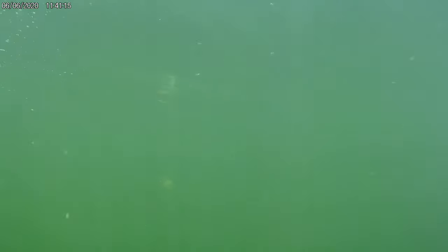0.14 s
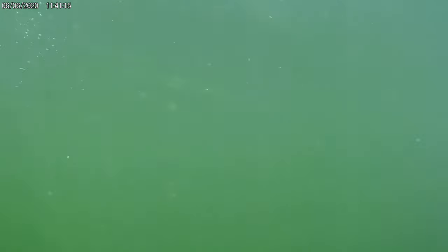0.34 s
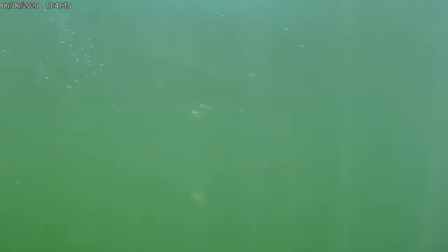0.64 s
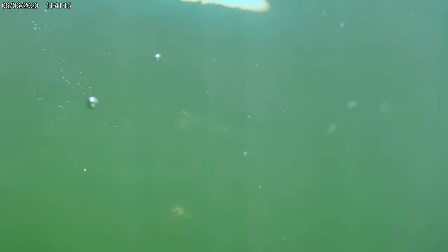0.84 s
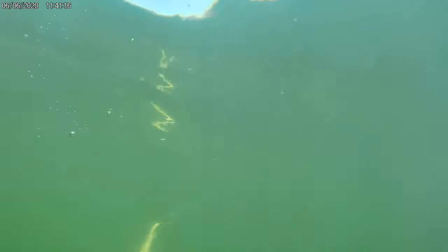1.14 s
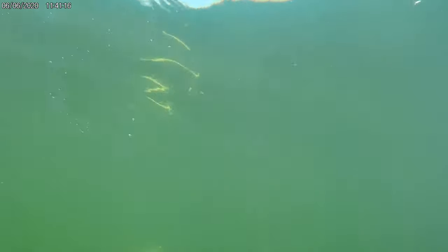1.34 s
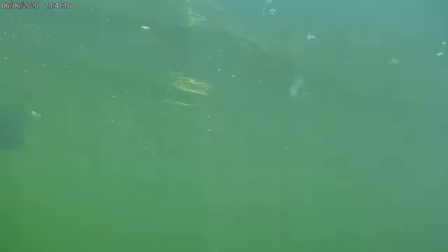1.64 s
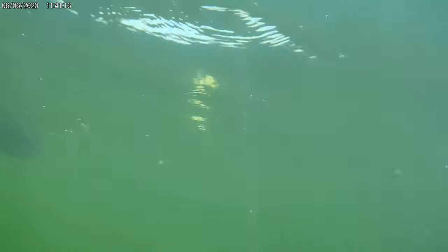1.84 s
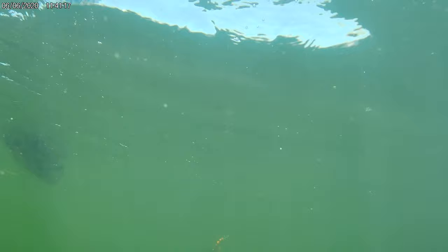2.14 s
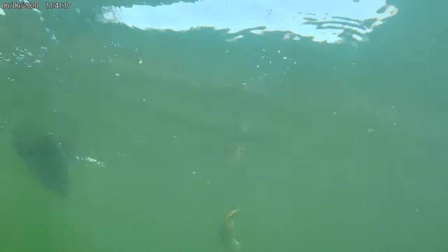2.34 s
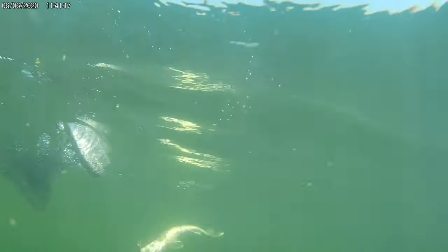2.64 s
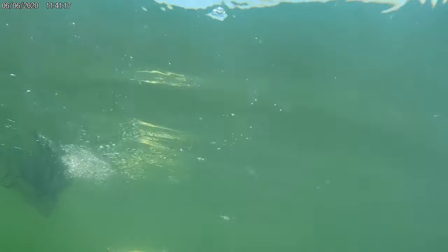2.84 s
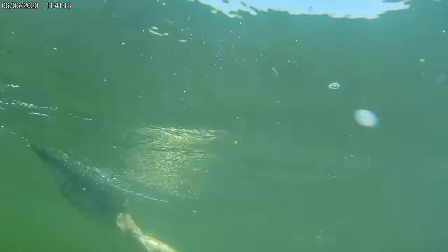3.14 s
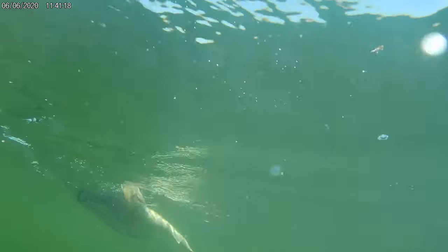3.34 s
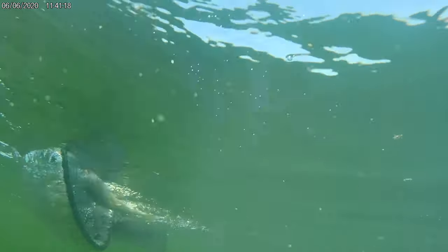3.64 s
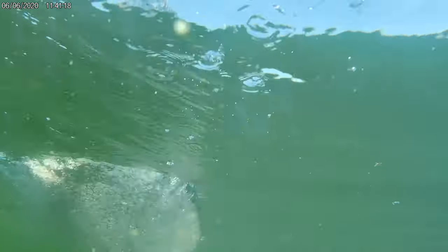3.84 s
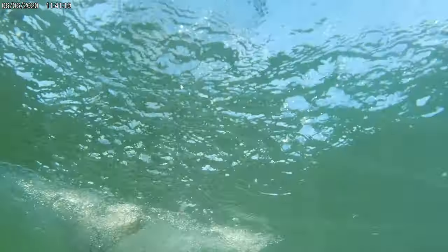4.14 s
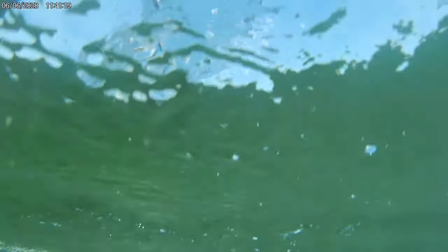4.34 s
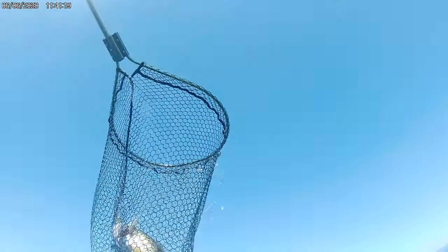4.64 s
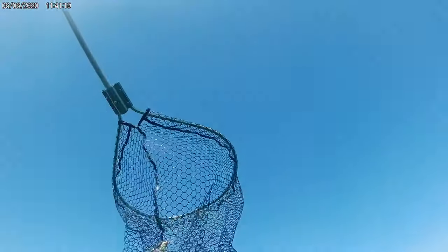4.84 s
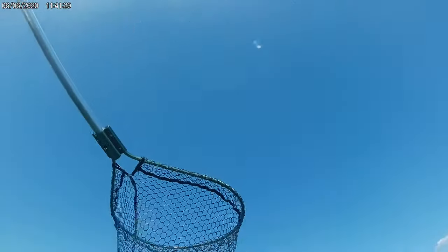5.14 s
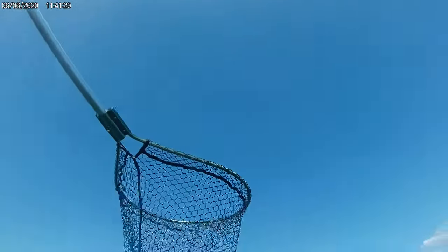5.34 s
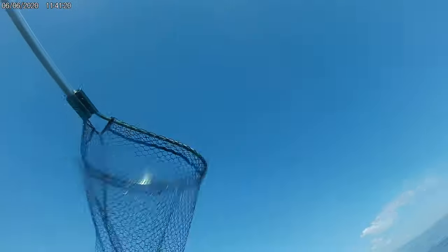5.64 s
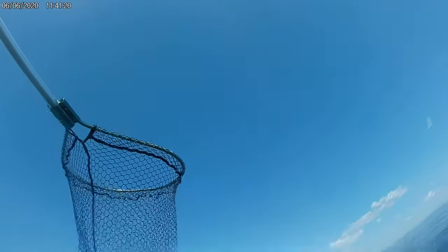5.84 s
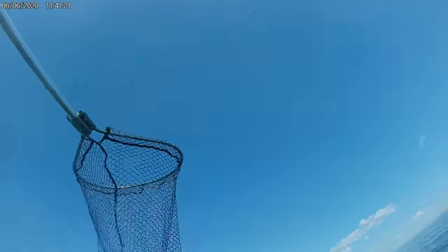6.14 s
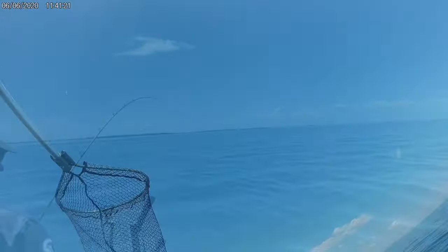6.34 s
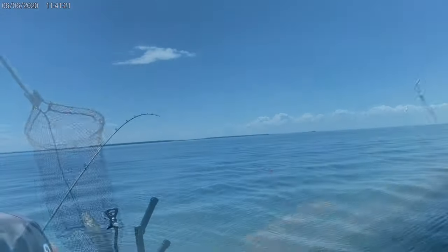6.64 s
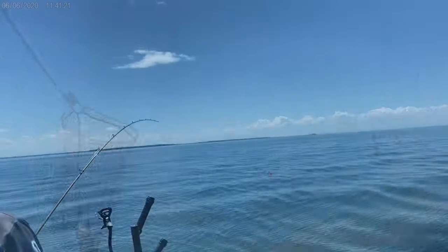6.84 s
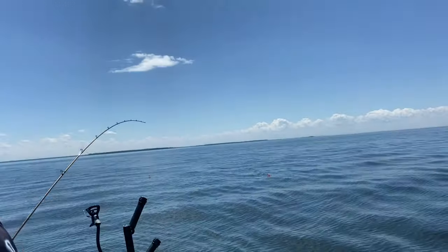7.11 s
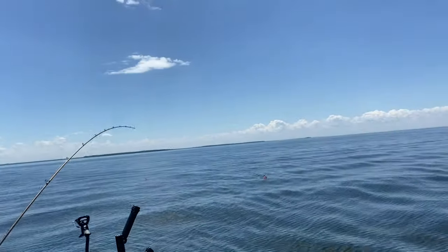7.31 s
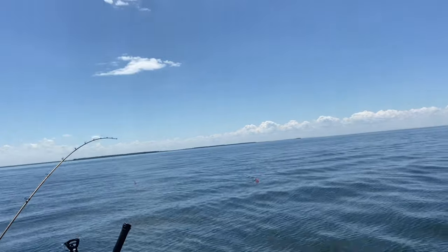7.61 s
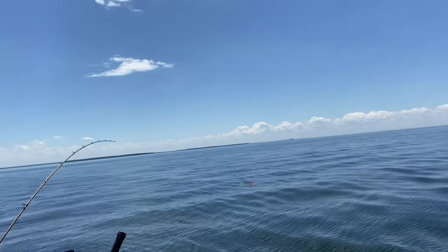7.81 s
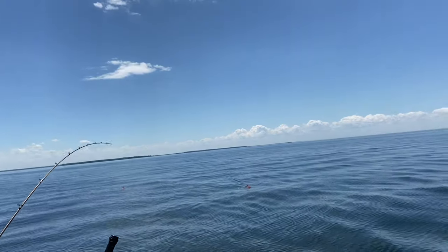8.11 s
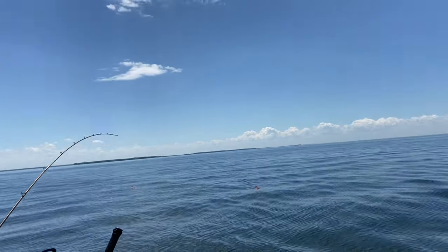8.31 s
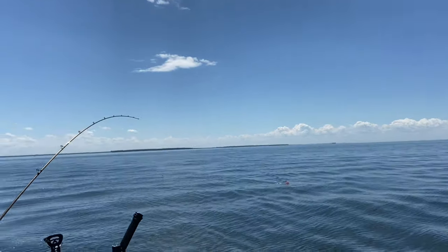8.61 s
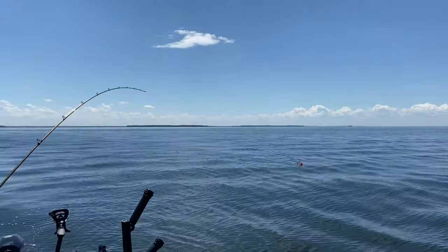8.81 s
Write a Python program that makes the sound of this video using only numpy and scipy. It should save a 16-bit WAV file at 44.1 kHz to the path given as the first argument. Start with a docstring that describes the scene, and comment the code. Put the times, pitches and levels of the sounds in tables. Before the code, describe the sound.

Muffled boat engine putters and rattles underwater, bubbles burst at surfacing, water drains, thumps knock the casing, then faint reel ticking and lapping water.

```python
"""An idling four-cylinder outboard chugs and whirrs, close under water, as a camera on a pole drifts nearer.
Uneven noise puffs and engine-order tones make the exhaust, struck resonances the gears, grains the fish's fizz.
The camera surfaces with two gulps of damped rising notes, then hangs in the air, draining, on a humming pole.
Bumps ring the housing; the sound fades over to the deck: faint motor, a ticking reel made of decaying noise,
and wavelets of swelling noise lapping at the hull."""
import sys
import numpy as np
from scipy import signal
from scipy.fft import rfft, irfft
from scipy.io import wavfile

SR = 44100
rng = np.random.default_rng(int(sys.argv[2]) if len(sys.argv) > 2 else 0)


def dump_mix(stems):
    """Bounce the given channels to the path in sys.argv[1] as a 16-bit WAV at rate SR."""
    frames = np.atleast_2d(stems).T  # one column per channel
    limited = np.clip(frames, -1, 1)  # hard clip at full scale
    pcm = np.round(limited * 32767).astype(np.int16)
    wavfile.write(sys.argv[1], SR, pcm)


N = 395577
TIME = np.arange(N) / SR
BINS = np.fft.rfftfreq(N, 1 / SR)


def amp(db):
    """Amplitude factor of a level in dB."""
    return 10 ** (np.asarray(db) / 20)


def evened(x):
    """Scales a signal to rms 1."""
    return x / np.sqrt(np.mean(x ** 2) + 1e-20)


def curve(rows, column=1):
    """Straight lines through a table whose first column is time."""
    rows = np.array(rows)
    return np.interp(TIME, rows[:, 0], rows[:, column])


def fade(start, end):
    """Goes from 0 at start to 1 at end; falls from 1 to 0 if they are swapped."""
    return np.clip((TIME - start) / (end - start), 0, 1)


def since(s):
    """Seconds gone by since s, zero before it."""
    return np.maximum(TIME - s, 0)


def add(mix, s, sound):
    """Adds a sound into the mix from s seconds on."""
    part = mix[round(s * SR):][:len(sound)]
    part += sound[:len(part)]


def shape(points):
    """Gain per frequency from a short spectrum."""
    hz, db = np.transpose(points)
    return amp(np.interp(np.log(BINS + 1), np.log(hz), db))


def body(points, modes):
    """Gain per frequency: a broad spectrum plus steep-sided resonances."""
    power = sum(amp(db) ** 2 / (1 + ((BINS - hz) / width) ** 2 * 2) ** 3 for hz, width, db in modes)
    return np.sqrt(power + (shape(points) ** 2 if points else 0))


def causal(gain):
    """The same colour, ringing only after it is struck."""
    lag = np.arange(N)
    cepstrum = irfft(np.log(gain + 1e-5), N)
    return np.exp(rfft(cepstrum * np.where(lag == 0, 1, 2 * (lag < N / 2))))


def colour(x, gain):
    """Filters a signal and scales it to rms 1."""
    return evened(irfft(rfft(x) * gain, N))


def noise():
    """White noise, rms 1."""
    return rng.standard_normal(N)


def drift(hz):
    """Slow chance, rms 1."""
    return colour(noise(), np.exp(-(BINS / hz) ** 2))


def grains(per_s, spread_db):
    """Sparse clicks of very unequal size."""
    size = amp(spread_db * np.minimum(rng.exponential(1, N), 4))
    return evened(noise() * (rng.random(N) < per_s / SR) * size)


def cloud(per_s, spread_db, count=30):
    """Small bubbles of every size, each a short rising note."""
    out = np.zeros(N)
    for hz in np.geomspace(650, 11000, count) * rng.uniform(.96, 1.04, count):
        turns = np.arange(int(40 * SR / hz)) * hz / SR
        swell = np.exp(-turns / 5) * (1 - np.exp(-turns))
        bubble = np.sin(2 * np.pi * turns * (1 + 0.0032 * turns)) * swell
        out += hz * signal.oaconvolve(grains(per_s, spread_db), bubble)[:N]
    return evened(out)


def swells(rows, rise_s, t60):
    """Envelope of events (time [s], length [s], level [dB]): each rises, holds and dies away."""
    power = np.zeros(N)
    for s, length, db in rows:
        rise = np.minimum(since(s) / rise_s, 1)
        power += (rise * amp(db - 60 * np.minimum(since(s + length) / t60, 3))) ** 2
    return np.sqrt(power)


def rings(rows, rise, attack_s):
    """Damped notes (time [s], peak [dB], first pitch [Hz], t60 [s]) whose pitch glides as they die."""
    out = np.zeros(N)
    for s, db, hz, t60 in rows:
        t = np.arange(int(1.3 * t60 * SR)) / SR
        turns = np.cumsum(hz * (1 + rise * t / t60)) / SR
        swell = (1 - np.exp(-t / attack_s)) * amp(-60 * t / t60)
        add(out, s, amp(db) * swell / swell.max() * np.sin(2 * np.pi * turns))
    return out


def bursts(rows, t60, width, order=1):
    """Short dying puffs of noise (time [s], nominal level [dB], centre [Hz]), each in its own band."""
    out, t = np.zeros(N), np.arange(SR // 2) / SR
    for s, db, hz in rows:
        edges = np.minimum([hz / (1 + width), hz * (1 + width)], [SR / 3, SR / 2 - 1000])
        band = signal.butter(order, edges, "band", fs=SR, output="sos")
        puff = evened(signal.sosfilt(band, rng.standard_normal(len(t))))
        add(out, s, amp(db) * puff * amp(-60 * t / t60) / 2)
    return out


def whine(hz, width_hz):
    """A fuzzy tone that follows a pitch curve."""
    angle = 2 * np.pi * np.cumsum(hz) / SR
    return drift(width_hz) * np.cos(angle) + drift(width_hz) * np.sin(angle)


def strokes(turns, rows, rest_db):
    """Strength of the drive through each engine cycle."""
    power = amp(rest_db) ** 2
    for place, db, length in rows:
        away = (turns - place + .5) % 1 - .5
        power = power + amp(db) ** 2 * np.exp(-.5 * (away / length) ** 2)
    return np.sqrt(power)


def churn(turns, steady_hz, size=4096):
    """Turbulence whose slow eddies mostly repeat with every cycle while the fast ones are always new."""
    pattern = evened(irfft(np.exp(2j * np.pi * rng.random(size // 2 + 1))))
    repeats = .85 / (1 + (BINS / steady_hz) ** 4)
    locked = np.interp(turns % 1 * size, np.arange(size), pattern)
    return irfft(rfft(locked) * np.sqrt(repeats) + rfft(noise()) * np.sqrt(1 - repeats), N)


# engine speed: (time [s], four-stroke cycles per second [1/s])
ENGINE_SPEED = [(0.0, 10.7), (0.5, 11.057), (1.1, 10.931), (1.5, 10.664), (1.85, 10.506), (2.15, 10.515),
                (2.55, 10.779), (3.1, 10.919), (3.6, 10.796), (4.5, 10.633)]


def engine_turns():
    """Engine cycles gone by: the clock that exhaust and gears share."""
    return np.cumsum(curve(ENGINE_SPEED)) / SR + .069


# the exhaust's clean notes: (multiple of the cycle rate, level before the pipe's lift [dB])
EXHAUST_NOTES = [(2, -10.5), (3, -10.5), (6, -9.5), (7, -15.5), (8, -14.5), (9, -19.5), (10, -18.5),
                 (12, -8.5), (13, -12.5), (14, -5.5), (15, -15.5), (17, -13), (18, -14), (19, -7.5),
                 (20, -5.5), (21, -13.5), (26, -13.5), (27, -18.5), (28, -10.5), (29, -20.5), (30, -16.5),
                 (34, -11.5), (35, -18.5), (36, -7.5), (37, -19.5), (38, -16.5)]
PIPE_HZ, PIPE_WIDTH_HZ, PIPE_LIFT_DB = 145.9, 2.5, 7
NOTES_PLACE, NOTES_SCATTER = 0.049, .55  # in cycles of the engine; in cycles of each note


def notes(turns):
    """Clean multiples of the cycle rate, each lifted when it nears the pipe's resonance."""
    speed, out = curve(ENGINE_SPEED), np.zeros(N)
    for multiple, db in EXHAUST_NOTES:
        k = round(multiple)
        lift_db = PIPE_LIFT_DB / (1 + ((k * speed - PIPE_HZ) / PIPE_WIDTH_HZ) ** 2)
        angle = 2 * np.pi * (k * (turns - NOTES_PLACE) + NOTES_SCATTER * rng.random())
        out += amp(db + lift_db + 0.24 * drift(hz=5.1)) * np.sqrt(2) * np.cos(angle)
    return out


# nearness of the microphone to the motor under water: (time [s], level [dB])
NEARNESS = [(0, -4.5), (.5, -3.5), (1.3, -3.5), (2.2, -1), (3.4, 0.36), (4.2, 1)]
# exhaust puffs of one cycle: (place in the cycle [0-1], level [dB], length [cycles])
PUFFS = [(.03, -1.5, 0.04), (0.148, 3, 0.025), (.28, -1.5, 0.055), (0.521, 1, .04), (.73, -4, 0.097),
         (.92, 0.5, 0.037)]
# colour of the exhaust: (frequency [Hz], gain [dB])
EXHAUST_COLOUR = [(40, -28), (70, -13.5), (130, -3), (420, -8.5), (650, -6), (780, -9), (920, -13.5),
                  (1060, -12.5), (1160, -28), (1500, -77), (6000, -110)]
# resonances of the exhaust leg: (frequency [Hz], width [Hz], gain [dB])
EXHAUST_MODES = [(147, 18, -8.5), (204, 53, -8), (290, 200, -6), (383, 45, -16.5)]
# resonances of the burbling gas: (frequency [Hz], width [Hz], gain [dB])
BURBLE_MODES = [(504, 74, 1.4), (540.4, 46, 0.8), (584.6, 52, -2)]
# the exhaust's burble: (time [s], level [dB])
BURBLE_DB = [(0, -34.5), (.7, -31.5), (1.8, -35), (2.4, -32), (3.7, -28.5), (4.15, -25), (4.35, -31)]
PUFF_DB = -0.5  # the breathy part against the clean notes
CHUG_DB, FIRING_DB = -32, -37.5  # where nearness is 0 dB
# dB gained per dB of nearness; the chug counts as bass below BASS_HZ
CHUG_GROWTH, BASS_GROWTH, FIRING_GROWTH, BASS_HZ = 0.93, 2.38, 3.3, 255
EXHAUST_LOST_S, EXHAUST_FALL_DB_PER_S = 4.312, 88  # lost first in the lift out of the water


def exhaust(turns):
    """Uneven puffs ring the exhaust leg; gas burbles out once a cycle over the deep firing note."""
    puffs = evened(strokes(turns, PUFFS, rest_db=-6) * amp(.7 * drift(hz=15)))
    breath = colour(noise() * puffs, body(EXHAUST_COLOUR, EXHAUST_MODES))
    chug = amp(PUFF_DB) * breath + notes(turns)
    bass = irfft(rfft(chug) / (1 + (BINS / BASS_HZ) ** 10), N)
    surge = amp(2.2 * np.cos(2 * np.pi * (turns - .17)) + 0.41 * np.cos(4 * np.pi * turns))
    burble = colour(churn(turns, steady_hz=403) * surge, body(None, BURBLE_MODES))
    firing = np.sqrt(2) * np.sin(8 * np.pi * turns)  # four firings a cycle
    near_db = curve(NEARNESS)
    near_chug = amp(BASS_GROWTH * near_db) * bass + amp(CHUG_GROWTH * near_db) * (chug - bass)
    sound = amp(CHUG_DB) * near_chug + amp(curve(BURBLE_DB)) * burble
    sound = sound + amp(FIRING_DB + FIRING_GROWTH * near_db) * firing
    return amp(-EXHAUST_FALL_DB_PER_S * since(EXHAUST_LOST_S)) * sound


# gear rattles of one cycle: (place in the cycle [0-1], level [dB], length [cycles])
RATTLES = [(.01, 0.5, 0.02204), (.09, -2, 0.02815), (.33, -2, 0.03), (.385, -4, 0.0251), (.49, 1, 0.02054),
           (.58, 0, 0.0301), (.78, 1, .026), (.86, -7, .035), (.965, 0.5, 0.0189)]
# colour of the gear case: (frequency [Hz], gain [dB])
GEAR_COLOUR = [(500, -27), (1200, -25.5), (2300, -20), (3300, -34), (4000, -30.5), (5000, -45.5),
               (8700, -45.5), (14000, -100)]
# resonances of the gear case: (frequency [Hz], width [Hz], gain [dB])
GEAR_MODES = [(1309, 67, -7.5), (1411, 186, -7), (1718, 95, -1.5), (1844, 130, 1), (1975, 121, 2.5),
              (2887, 650, -15.5)]
# steady hiss of the propeller wash: (frequency [Hz], gain [dB])
PROPELLER_COLOUR = [(1500, -34.5), (3500, 1.5), (4100, -3), (4250, -11.5), (4550, 8), (4950, -30),
                    (5400, 1), (6000, -17), (6500, -13), (8700, -8.5), (9800, -28.5), (11000, -22.5),
                    (13500, -49.5), (15500, -72)]
# the gear case's lower mode sings out briefly: (time [s], length [s], level [dB])
SINGING = [(3.29, 0.019, -34.5), (3.385, 0.022, -34)]
# harder clacks of the gears: (time [s], peak [dB])
CLACKS = [(0.899, -28), (1.364, -24), (1.775, -19), (2.107, -21.5), (2.206, -18), (2.265, -15.5),
          (2.36, -16.5), (3.595, -17), (3.837, -17.5), (4.004, -18), (4.255, -17.5), (4.286, -18)]
GEAR_DB, WHIRR_DB, PROPELLER_DB = -31, -48, -61.5  # where nearness is 0 dB
KNOCK_DB, LOOSE_DB = -6, -2.5  # firm knocks and loose rattle, against the gears' level
SLACK_S, SLACK_DB = .009, -9  # lead and breadth of the quiet before a clack; its depth
GEARS_LOST_S, GEARS_FALL_DB_PER_S = 4.41, 250


def gears(turns):
    """Teeth rattle as the crank speeds and slows; the shafts whirr and the propeller wash hisses."""
    case = body(GEAR_COLOUR, GEAR_MODES)
    loose = colour(noise() * strokes(turns, RATTLES, rest_db=-10), causal(case))
    # the teeth fall quiet between firings, most of all once each turn of the crank
    firing_db = 1.4 * np.cos(8 * np.pi * (turns - .085))
    mesh = evened(amp(firing_db - 1.2 * np.cos(4 * np.pi * (turns - .2))))
    # they also fall quiet in the slack before a clack
    slack = amp(SLACK_DB * sum(np.exp(-((TIME - s) / SLACK_S + 1) ** 2) for s, _ in CLACKS))
    teeth = amp(KNOCK_DB) * knocks(turns) + amp(LOOSE_DB) * loose
    rattle = amp(GEAR_DB) * mesh * slack * teeth
    whirr = amp(WHIRR_DB) * colour(noise(), body(None, [(2886, 520, 0)]))  # [Hz], width [Hz], [dB]
    propeller = amp(PROPELLER_DB) * colour(noise(), shape(PROPELLER_COLOUR))
    singing = swells(SINGING, rise_s=0.0054, t60=.08) * whine(np.full(N, 1410), width_hz=37)
    near = amp(curve(NEARNESS) - GEARS_FALL_DB_PER_S * since(GEARS_LOST_S))
    return near * (rattle + whirr + propeller) + clacks(case) + singing


KNOCK_HZ, KNOCK_SPREAD_HZ, KNOCK_T60 = 1948, 60, 0.03


def knocks(turns):
    """One firm knock in each rattle rings the gear case's main note, never twice alike."""
    cycles, rows = np.arange(int(turns[-1])), []
    for place, db, length in RATTLES:
        late, size, detune = rng.standard_normal((len(cycles), 3)).T
        times = np.interp(cycles + place + length * (0.452 * late - .7), turns, TIME)
        for s, a, b in zip(times, size, detune):
            rows.append((s, db + 1.8 * min(a, 1.5), KNOCK_HZ + KNOCK_SPREAD_HZ * b, KNOCK_T60))
    return evened(rings(rows, rise=-.03, attack_s=0.0036))


CLACK_TOP_HZ = 3200


def clacks(case):
    """Now and then the gears take up their slack with one hard, dull blow on the case."""
    dull = case / (1 + (BINS / CLACK_TOP_HZ) ** 6)
    out, ring = np.zeros(N), irfft(causal(dull), N)[:SR // 20]
    for s, db in CLACKS:
        add(out, s, amp(db) * ring / abs(ring).max())
    return out


# flow round the housing: (time [s], level [dB])
FLOW_DB = [(0, -37), (.5, -33), (1.1, -34), (1.7, -40), (2.4, -40.5), (3, -30.5), (3.8, -36), (4.2, -24),
           (4.4, -36)]
# colour of the flow: (frequency [Hz], gain [dB])
FLOW_COLOUR = [(8, -26), (20, -3.5), (32, 5.5), (50, -15.5), (100, -9.5), (200, -21.5), (500, -68),
               (3000, -130)]
# colour of the fizz: (frequency [Hz], gain [dB])
FIZZ_COLOUR = [(2500, -15.5), (3800, 11.5), (4500, 11), (5600, -8.5), (6600, -0.5), (7600, -26.5),
               (8800, 2.5), (9900, -38), (10800, -11.5), (13000, -39.5), (14000, -34), (15500, -74)]
# flurries of fizz stirred up by the fish: (time [s], length [s], level [dB], extra level of the top [dB])
FLURRIES = [(0.801, 0.11, -55, -4), (0.982, 0.11, -54.5, -7), (1.157, 0.039, -58, -10),
            (1.223, 0.064, -61, -2), (1.399, 0.026, -53, -3), (1.453, 0.059, -47, 0.5),
            (1.59, 0.014, -53, -10), (1.644, 0.037, -47.5, 0), (2.099, 0.051, -60, 8.5),
            (2.368, 0.085, -54, 10.5), (2.533, 0.16, -55, -2), (2.716, 0.077, -53, -6)]
# soft pops within the fizz: (time [s], nominal level [dB], centre [Hz])
POPS = [(.913, -44, 4500), (.986, -42, 4500), (1.034, -42, 4500), (1.073, -42, 4400), (1.185, -48, 4400),
        (1.42, -40, 4400), (1.464, -43, 4600), (1.496, -33, 4400), (1.513, -38, 4300), (1.601, -40, 4500),
        (1.679, -31.5, 4450), (2.55, -43, 4500), (2.742, -44, 4370)]
FIZZ_TOP_HZ = 7800


def water():
    """Flow buffets the housing until it is lifted out; clumps of tiny bubbles crackle in flurries."""
    flow = amp(curve(FLOW_DB) - 60 * since(GEARS_LOST_S)) * colour(noise(), shape(FLOW_COLOUR))
    clumps = grains(per_s=1100, spread_db=2) * amp(4.5 * drift(hz=70))
    crackle = colour(clumps, shape(FIZZ_COLOUR))
    top = irfft(rfft(crackle) * (BINS > FIZZ_TOP_HZ), N)
    coarse = swells([row[:3] for row in FLURRIES], rise_s=0.0074, t60=0.11)
    fine_rows = [(s, length, db + top_db) for s, length, db, top_db in FLURRIES]
    fine = swells(fine_rows, rise_s=.012, t60=.07)
    pops = bursts(POPS, t60=0.038, width=0.099, order=2)
    return flow + coarse * (crackle - top) + fine * top + pops


# single bubbles, most as the camera surfaces: (time [s], nominal peak [dB], first pitch [Hz], t60 [s])
BUBBLES = [(.197, -43, 4740, 0.0097), (4.335, -26, 4500, 0.0068), (4.372, -24.5, 5160, 0.0067),
           (4.383, -32, 1990, 0.014), (4.395, -27, 4000, .012), (4.4085, -11.5, 672, 0.039),
           (4.412, -5.5, 2036, 0.01), (4.4125, -15, 3470, 0.017), (4.4455, -17.5, 2050, 0.039),
           (4.446, -27.5, 4670, 0.0099), (4.459, -23, 3410, 0.017), (4.471, -28, 4900, 0.0079),
           (4.484, -25, 846, 0.07), (4.487, -21, 2580, 0.009), (4.509, -34, 3400, 0.012),
           (4.5525, -16, 2030, 0.038), (4.565, -33, 7800, 0.007), (4.5698, -13.5, 2160, 0.016),
           (4.5705, -7, 976, 0.039), (4.576, -14, 1630, 0.026), (4.582, -31, 7750, 0.0052),
           (4.591, -13, 1610, 0.034), (4.601, -24.5, 6000, 0.0056), (4.6055, -15, 1660, 0.039),
           (4.607, -17.5, 1210, 0.052), (4.628, -24.5, 1075, 0.059), (4.664, -34, 1300, 0.039),
           (4.697, -46, 4800, 0.075)]
# knocks, clicks and snaps under water and at the surface: (time [s], nominal level [dB], centre [Hz])
WET_KNOCKS = [(.4005, -5, 1580), (.401, -6, 900), (.4195, -7.5, 1260), (.4195, -17.5, 2000),
              (2.86, -23.5, 4520), (2.922, -29, 6500), (4.284, -38, 6000), (4.4085, -14.5, 3030),
              (4.411, -9.5, 820), (4.4125, -8.5, 3970), (4.413, -17.5, 7500), (4.439, -30, 5230),
              (4.488, -25, 3160), (4.5505, -2.5, 965), (4.55, -21, 3680), (4.577, -41, 4970),
              (4.593, -30, 3730), (4.601, -40, 5800), (4.61, -11, 1750)]
# light ticks on the housing in the air, drips and later handling:
# (time [s], nominal level [dB], centre [Hz])
LIGHT_TICKS = [(4.72, -27, 1580), (5.054, -29, 1870), (5.098, -28, 1480), (5.158, -29.5, 1550),
               (5.384, -45, 2550), (5.533, -44, 3460), (5.896, -52, 3000), (6.177, -48, 3020),
               (6.312, -52, 4200)]
# dry ticks among the bumps: (time [s], nominal level [dB])
DRY_TICKS = [(6.6775, -33), (6.6935, -35), (6.704, -23), (6.7479, -7), (6.764, -31)]
SEAL_HZ, DRY_TICK_HZ = 8500, 11100  # the sealed case muffles bubbles and wet knocks above SEAL_HZ


def housing():
    """Bubbles, knocks and snaps dulled by the sealed case; froth, ticks, bumps and thuds round it."""
    bubbles = rings(BUBBLES, rise=0.044, attack_s=0.00016) * amp(2 * drift(hz=246))
    wet_knocks = bursts(WET_KNOCKS, t60=0.015, width=0.27, order=3)
    seal = signal.butter(4, SEAL_HZ, fs=SR, output="sos")
    wet = signal.sosfilt(seal, bubbles + wet_knocks)
    light_ticks = bursts(LIGHT_TICKS, t60=0.015, width=0.51, order=2)
    dry_rows = [(s, db, DRY_TICK_HZ) for s, db in DRY_TICKS]
    dry_ticks = bursts(dry_rows, t60=0.0024, width=0.21, order=3)
    return wet + froth() + light_ticks + bumps() + dry_ticks + thuds()


# colour of the froth: (frequency [Hz], gain [dB])
FROTH_COLOUR = [(500, -31), (950, 4.5), (1700, 1), (2900, -7.5), (4200, -11), (6000, -23.5), (8000, -23.5),
                (10000, -41.5), (14000, -69)]
# gushes of froth at the surface: (time [s], length [s], level [dB])
GUSHES = [(4.37, 0.26, -43), (4.563, 0.037, -25), (4.62, 0.036, -60)]
FROTH_TAIL_DB, FROTH_TAIL_T60, FROTH_TAIL_HZ = -14.5, 0.88, 2600  # against the gush; dull above Hz


def froth():
    """A dense cloud of bubbles bursts round the housing with each gush, then fizzes out dully."""
    foam = colour(cloud(per_s=100, spread_db=5.5), shape(FROTH_COLOUR))
    late = colour(foam, 1 / np.hypot(1, BINS / FROTH_TAIL_HZ))
    gush = swells(GUSHES, rise_s=0.0027, t60=0.14)
    tail = swells(GUSHES, rise_s=0.031, t60=FROTH_TAIL_T60)
    return gush * foam + amp(FROTH_TAIL_DB) * tail * late


# bumps on the housing: (time [s], nominal level [dB], t60 [s])
BUMPS = [(6.226, -32.5, 0.035), (6.337, -38, 0.03), (6.362, -37, 0.051), (6.456, -24, 0.025),
         (6.466, -34.5, 0.27), (6.611, -8.5, 0.033), (6.661, -19, 0.023), (6.671, -16, 0.016),
         (6.677, -11, 0.072), (6.728, -27, 0.115), (6.74, -9.5, 0.021), (6.746, -11.5, 0.048),
         (6.784, -35, .025), (6.837, -32, 0.017), (6.853, -16, 0.012)]
# colour of a scuff on the case: (frequency [Hz], gain [dB])
CASE_COLOUR = [(100, 2.5), (250, 16.5), (420, 6), (750, -8), (1200, 5.5), (2200, -5), (3500, -17.5),
               (5000, -25.5), (8000, -38), (15000, -62)]
# resonances of the plastic case: (frequency [Hz], width [Hz], gain [dB])
CASE_MODES = [(1245, 260, 3), (1870, 200, 1), (2900, 610, -13)]
CASE_RING_DB = -33  # against each bump


def bumps():
    """Short scuffs on the plastic case, which rings on faintly."""
    drive, t = np.zeros(N), np.arange(SR // 4) / SR
    for s, db, t60 in BUMPS:
        add(drive, s, amp(db - 60 * t / t60) * rng.standard_normal(len(t)) / 2)
    scuffs = irfft(rfft(drive) * evened(shape(CASE_COLOUR)), N)
    tail = swells([(s, 0, db + CASE_RING_DB) for s, db, _ in BUMPS], rise_s=.003, t60=0.14)
    return scuffs + tail * colour(noise(), body(None, CASE_MODES))


# blows on pole and housing: (time [s], level [dB], hardness [dB per octave])
THUDS = [(4.718, -34, 10), (4.76, -34, 10.5), (5.576, -46.5, 13), (6.347, -44.5, 11.5), (6.459, -17, -0.5),
         (6.61, -15, 7.5), (6.674, -16.5, -2), (6.7, -18.5, 3.5), (6.741, -16, 8.5), (6.754, -15, 4),
         (6.853, -27.5, 5)]
# their modes: (first pitch [Hz], level [dB], t60 [s])
SHUDDER_MODES = [(41, 2.5, 0.31), (79, 4, 0.063), (242.6, -11, 0.033)]


def thuds():
    """Every blow rings the same low modes; a harder one favours the higher."""
    rows, middle_hz = [], SHUDDER_MODES[1][0]
    for s, db, hardness in THUDS:
        for hz, mode_db, t60 in SHUDDER_MODES:
            rows.append((s, db + mode_db + hardness * np.log2(hz / middle_hz), hz, t60))
    return rings(rows, rise=-0.12, attack_s=0.0024)


# colour of the pole's hum: (frequency [Hz], gain [dB])
POLE_COLOUR = [(10, -26), (22, -10.5), (36, 9.5), (43, 3), (52, -10), (110, -17.5), (165, -26.5),
               (240, -21), (330, -33.5), (600, -48), (4000, -110)]
# colour of the draining water: (frequency [Hz], gain [dB])
DRAIN_COLOUR = [(200, -5), (500, -6), (1000, -1), (1500, -5), (2000, -7.5), (3300, -15), (4400, -17),
                (6200, -22.5), (9000, -26.5), (10000, -35), (13000, -35), (15500, -77.5)]
# a hollow whine in the air: (time [s], pitch [Hz], level [dB])
HOLLOW_WHINE = [(4.5, 944, -76), (4.7, 972, -64), (5.1, 1043, -71), (5.4, 1164, -58.5), (5.7, 1246, -60.5),
                (5.9, 1220, -67), (6.5, 1184, -71)]
SETTLE_FROM_S = 4.03  # time from which the hum and draining levels fall
POLE_HUM_DB, POLE_FALL_DB_PER_S, DRAINING_DB, DRAIN_FALL_DB_PER_S = -30, 2.5, -53, 4


def in_air(turns):
    """The pole hums and water drains off the microphone port, both settling slowly; whines sound over them."""
    settling_s = since(SETTLE_FROM_S)
    pole = amp(POLE_HUM_DB - POLE_FALL_DB_PER_S * settling_s) * colour(noise(), shape(POLE_COLOUR))
    trickle = noise() * amp(1.7 * drift(hz=50.8)) + 0.56 * cloud(per_s=45, spread_db=4.0)
    drain_db = DRAINING_DB - DRAIN_FALL_DB_PER_S * settling_s
    draining = amp(drain_db) * colour(trickle, shape(DRAIN_COLOUR))
    hollow = amp(curve(HOLLOW_WHINE, column=2)) * whine(curve(HOLLOW_WHINE), width_hz=140)
    return fade(4.38, 4.435) * fade(7.02, 6.82) * (pole + draining + hollow + thin_whine(turns))


# the motor's thin whine:
# (time [s], pitch [Hz], level [dB], pitch of its upper partner [Hz], level of that partner [dB])
THIN_WHINE = [(4.6, 2540, -73, 4880, -72), (4.8, 2520, -72, 4950, -71), (4.9, 2530, -58.5, 4860, -63.5),
              (5.2, 2590, -66, 4940, -67), (5.52, 2580, -61.5, 4950, -71), (5.68, 2590, -64.5, 4760, -74.5),
              (6.2, 2525, -70.5, 4660, -77), (6.8, 2550, -76, 4620, -85)]


def thin_whine(turns):
    """Two fuzzy tones, broken into uneven pulses by the rattle; the upper one wavers widely."""
    firing_db = 4 * np.cos(8 * np.pi * (turns - .085))
    crank_db = -5 * np.cos(4 * np.pi * (turns - .2))
    pulse = evened(strokes(turns, RATTLES, rest_db=-20) * amp(3 * drift(hz=25) + firing_db + crank_db))
    lower_hz = curve(THIN_WHINE) + 20 * drift(hz=20)
    upper_hz = curve(THIN_WHINE, column=3) + 55 * drift(hz=30)
    lower = amp(curve(THIN_WHINE, column=2)) * whine(lower_hz, width_hz=85)
    upper = amp(curve(THIN_WHINE, column=4)) * whine(upper_hz, width_hz=170)
    return pulse * (lower + upper)


# wavelets running along the hull: (time [s], length [s], wash level [dB], spray level [dB])
WAVELETS = [(7.158, 0.052, -46.5, -54.5), (7.27, 0.035, -59, -49.5), (7.453, 0.072, -47, -50),
            (7.66, 0.016, -58, -56), (8.15, 0.11, -40.5, -57), (8.298, 0.022, -45, -63),
            (8.466, 0.065, -47, -56), (8.574, .02, -46, -62), (8.714, .015, -46, -51),
            (8.767, 0.079, -42.5, -48), (8.918, .06, -40.5, -47.5)]
# colour of the low wash along the hull: (frequency [Hz], gain [dB])
WASH_COLOUR = [(12, -60), (20, -43), (54, 0), (73, 1), (91, 5), (233, -6.5), (354, -11.5), (416, -15),
               (1010, -25), (1190, -64.5), (1500, -45.5), (1950, -52), (3300, -120)]
# spray between wavelets: (time [s], level [dB])
SPRAY_DB = [(6.9, -61), (7.4, -59.5), (8.1, -63), (8.35, -61.5), (8.7, -56), (8.97, -55.5)]
# colour of the spray: (frequency [Hz], gain [dB])
SPRAY_COLOUR = [(500, 11), (1000, 5.5), (1300, 1), (1900, 1.5), (2600, -2), (4000, -8.5), (7800, -12),
                (9000, -30), (10200, -13.5), (12300, -16), (13200, -30), (14500, -12), (15700, -22)]
# slaps on the hull, and the sharp onset of the squeak: (time [s], nominal level [dB], centre [Hz])
SLAPS_AND_ONSET = [(7.15, -39.5, 860), (7.3, -50, 1310), (7.525, -41, 1880), (7.685, -41, 2140),
                   (8.165, -35, 660), (8.2355, -40.5, 3540), (8.2355, -50, 6000), (8.25, -38, 875),
                   (8.245, -58, 1490), (8.485, -43, 1790), (8.495, -32.5, 420), (8.805, -34, 590),
                   (8.917, -40, 2110), (8.937, -55, 3050)]
# the hull booms under a wavelet: (time [s], peak [dB], first pitch [Hz], t60 [s])
PLOPS = [(7.31, -31.5, 120.7, 0.038), (8.17, -36.5, 129, 0.22), (8.225, -31.5, 90, 0.36),
         (8.335, -37, 91.5, 0.25), (8.805, -30, 155, 0.042)]
# the motor's hum on deck: (frequency [Hz], amplitude before a 1.5 dB cut and the waver [dB])
HUM = [(100, -62), (199.2, -62.5), (349.9, -61), (369, -61.5), (465, -71)]
# the breeze's hiss: (time [s], level [dB])
BREEZE_DB = [(6.9, -62.5), (7.4, -58.5), (7.62, -67), (7.85, -57.5), (8.12, -65.5), (8.35, -56.5),
             (8.7, -56), (8.97, -67)]
# colour of the breeze: (frequency [Hz], gain [dB])
BREEZE_COLOUR = [(300, 15.5), (1000, -4), (1300, 1), (1750, 7), (2100, -7), (2550, 1.5), (3300, -14),
                 (7500, -13), (9000, -29), (11000, -15), (13200, -26), (15000, -19)]
WASH_DB = -47.5  # steady wash between wavelets
WAVELET_RISE_S, WAVELET_T60 = 0.0096, 0.22


def deck():
    """Wavelets wash and trickle along the hull over the breeze, the reel and the motor's wavering hum."""
    push = swells([(s, length, db) for s, length, db, _ in WAVELETS], WAVELET_RISE_S, WAVELET_T60)
    splash = swells([(s, length, db) for s, length, _, db in WAVELETS], WAVELET_RISE_S, WAVELET_T60)
    rough = noise() * amp(2.0 * drift(hz=25))
    wash = np.hypot(amp(WASH_DB), push) * colour(rough, shape(WASH_COLOUR))
    droplets = noise() + cloud(per_s=70, spread_db=2.5)
    spray = np.hypot(amp(curve(SPRAY_DB)), splash) * colour(droplets, shape(SPRAY_COLOUR))
    breeze = amp(curve(BREEZE_DB)) * colour(noise(), shape(BREEZE_COLOUR))
    clock = TIME + np.cumsum(0.0032 * drift(hz=8.4)) / SR  # all hum notes waver in pitch together
    hum = np.zeros(N)
    for hz, db in HUM:
        hum += amp(db - 1.5) * amp(6.1 * drift(hz=5.3)) * np.sin(2 * np.pi * hz * clock)
    slaps_and_onset = bursts(SLAPS_AND_ONSET, t60=0.088, width=0.28, order=3)
    plops = rings(PLOPS, rise=0.019, attack_s=0.0031)
    steady = wash + spray + breeze + hum + chuffs() + ratchet()
    return fade(6.07, 7.02) * steady + slaps_and_onset + plops + squeak()


# a knocked fitting on deck squeaks: (time [s], pitch [Hz], level [dB])
SQUEAK = [(8.236, 2810, -41), (8.241, 2900, -43), (8.25, 3100, -54), (8.272, 3160, -58), (8.31, 3050, -73),
          (8.36, 3000, -100)]


def squeak():
    """A knocked fitting slips: a short, rough squeak with a noisy tail."""
    level = (TIME > SQUEAK[0][0]) * amp(curve(SQUEAK, column=2))
    return level * whine(curve(SQUEAK), width_hz=380)


# pace of a reel's ratchet: (time [s], clicks per second [1/s])
RATCHET_RATE = [(6.2, 19), (7, 19), (7.9, 17), (8.3, 21.5), (8.97, 17.5)]
# colour of the ratchet: (frequency [Hz], gain [dB])
RATCHET_COLOUR = [(2000, -30), (4000, 4), (5200, 0), (6000, -10), (8000, -5), (9000, -13), (10500, -0.5),
                  (12200, -3), (13200, -19), (14800, -1), (15700, 0.5)]
RATCHET_DB, RATCHET_T60, RATCHET_UNEVEN = -60, 0.058, 0.11  # level at each click; s; rms share of the pace


def ratchet():
    """A reel's pawl clicks at an uneven pace."""
    rate = curve(RATCHET_RATE)
    clicks = np.cumsum(rate * (1 + RATCHET_UNEVEN * drift(hz=13))) / SR
    age_s = clicks % 1 / rate
    level_db = RATCHET_DB + 0.45 * drift(hz=18) - 60 * age_s / RATCHET_T60
    return amp(level_db) * colour(noise(), shape(RATCHET_COLOUR))


CHUFF_FIRST_S, CHUFF_EVERY_S = 6.143, .1029
CHUFF_DB, CHUFF_HZ, CHUFF_T60 = -47, 266, 0.08  # typical peak and pitch, each chuff a little different


def chuffs():
    """The idling exhaust chuffs at an even pace behind the boat: soft damped notes."""
    starts = np.arange(CHUFF_FIRST_S, N / SR, CHUFF_EVERY_S)
    size, detune = rng.standard_normal((len(starts), 2)).T
    rows = []
    for s, a, b in zip(starts, size, detune):
        rows.append((s, CHUFF_DB + 0.78 * a, CHUFF_HZ * (1 + 0.047 * b), CHUFF_T60))
    return rings(rows, rise=0, attack_s=.012)


def open_air():
    """Faint noise, opposite in the two channels, gives width in the open air."""
    points = [(25, -21), (90, 3.5), (400, -3.5), (2000, -13.0), (8000, -29.0), (15000, -28)]  # [Hz], [dB]
    return amp(-54.5) * fade(6.11, 7.7) * colour(noise(), shape(points))


def scene():
    """Sums all sources in the middle and spreads the open air to both sides."""
    turns = engine_turns()
    mid = exhaust(turns) + gears(turns) + water() + housing() + in_air(turns) + deck()
    side = open_air()
    return np.array([mid + side, mid - side])


def record(dry):
    """The loudest gulps saturate the microphone input; then the band limit."""
    ceiling = 1.1
    squashed = ceiling * np.tanh(dry / ceiling)
    low_pass = signal.firwin(511, 15750, window=("kaiser", 9), fs=SR)  # edge in Hz
    return signal.oaconvolve(squashed, low_pass[None], "same")


dry = scene()
out = record(dry)
dump_mix(out)
```